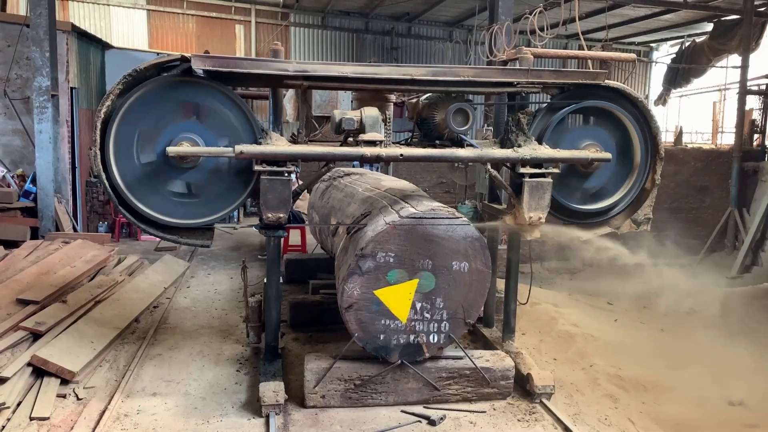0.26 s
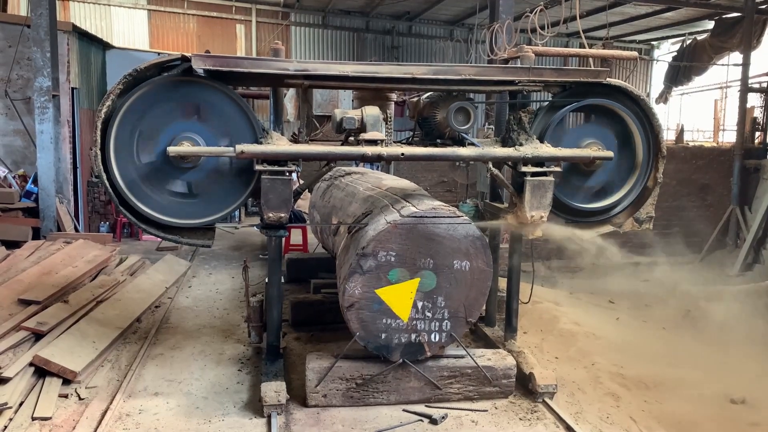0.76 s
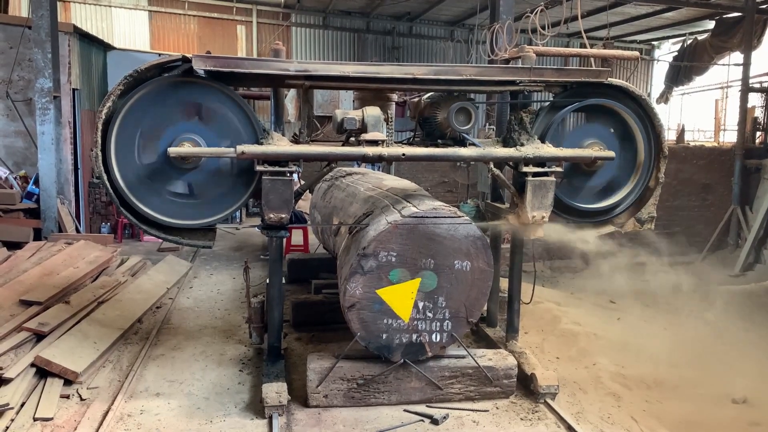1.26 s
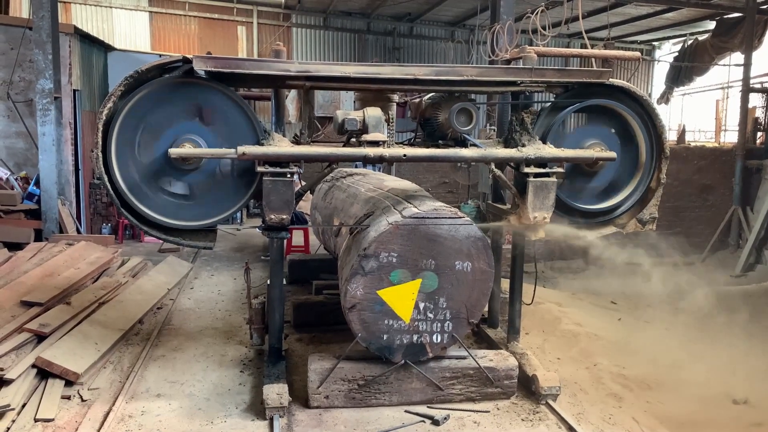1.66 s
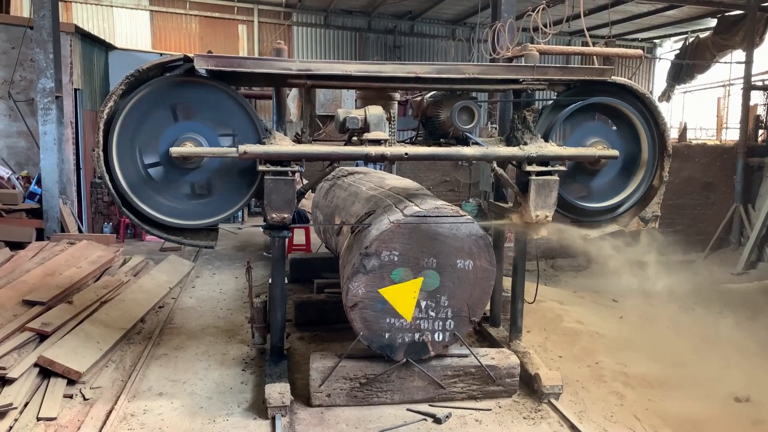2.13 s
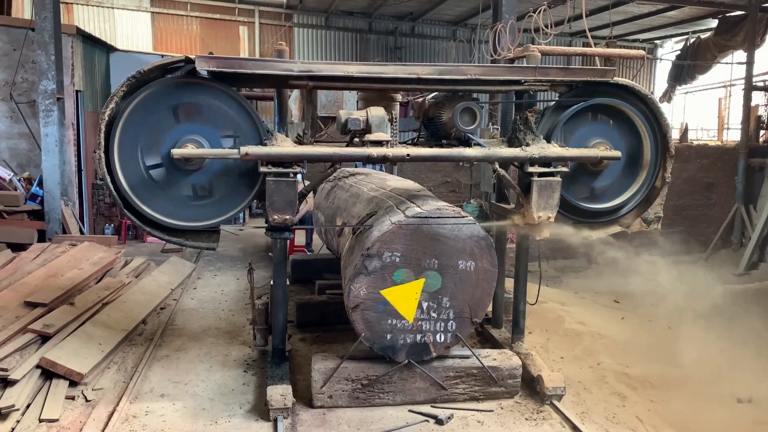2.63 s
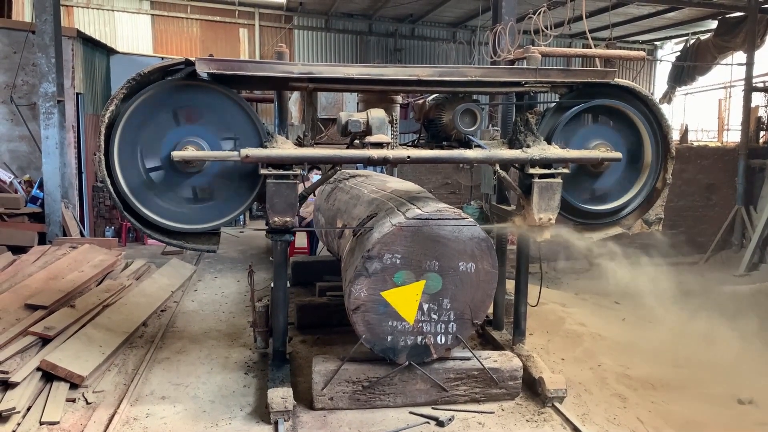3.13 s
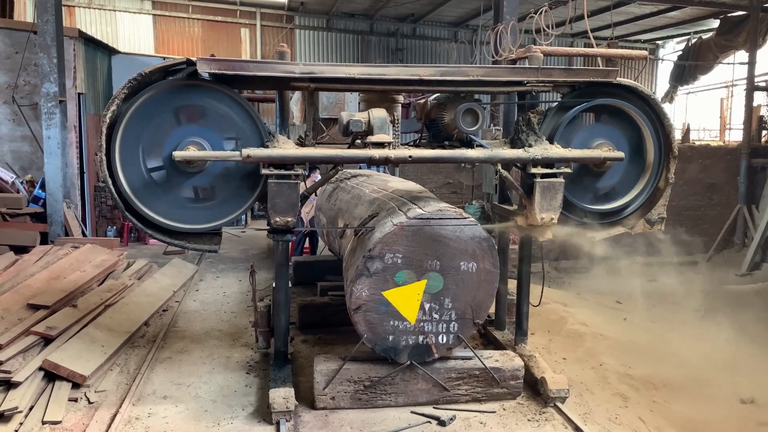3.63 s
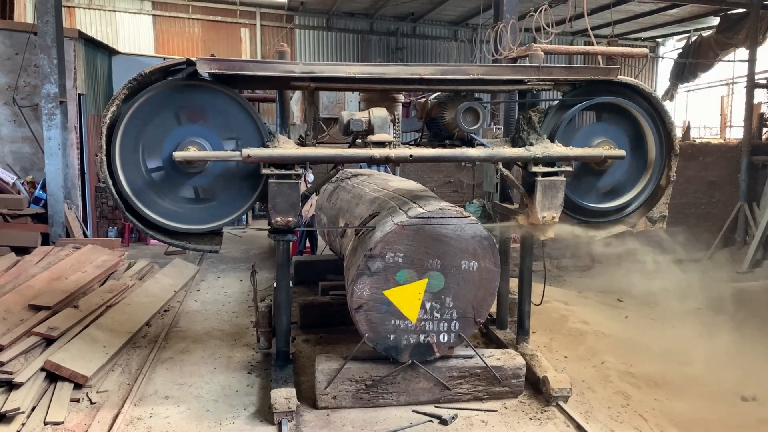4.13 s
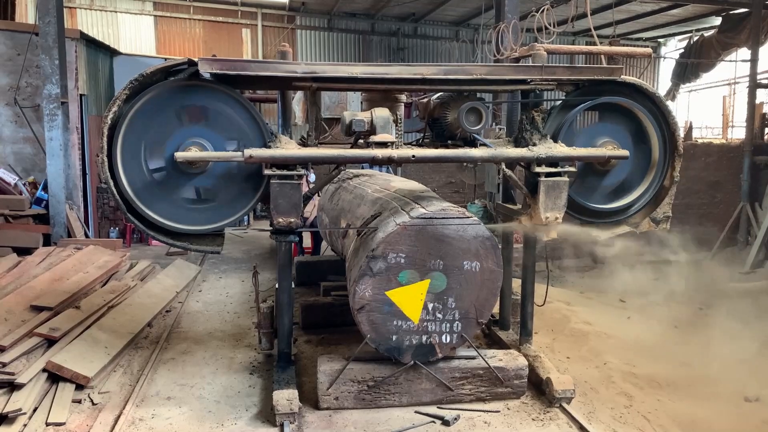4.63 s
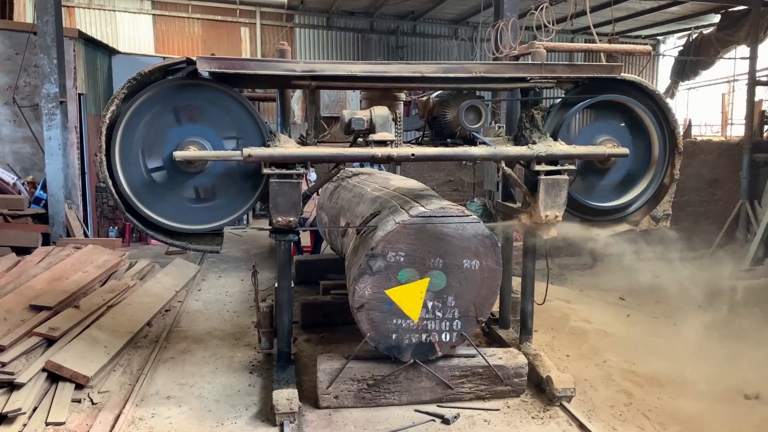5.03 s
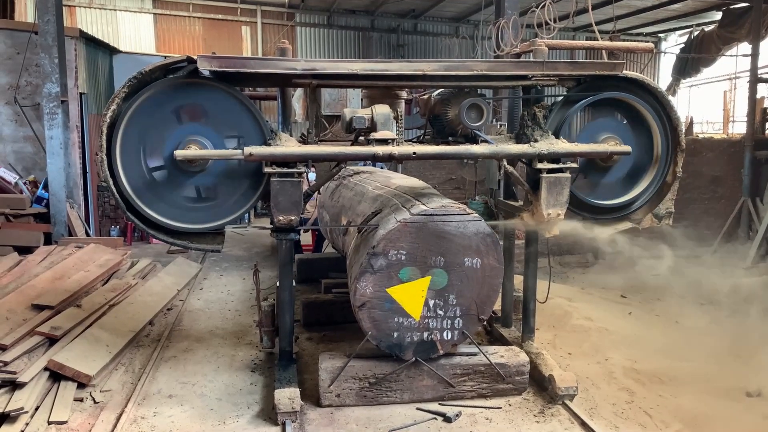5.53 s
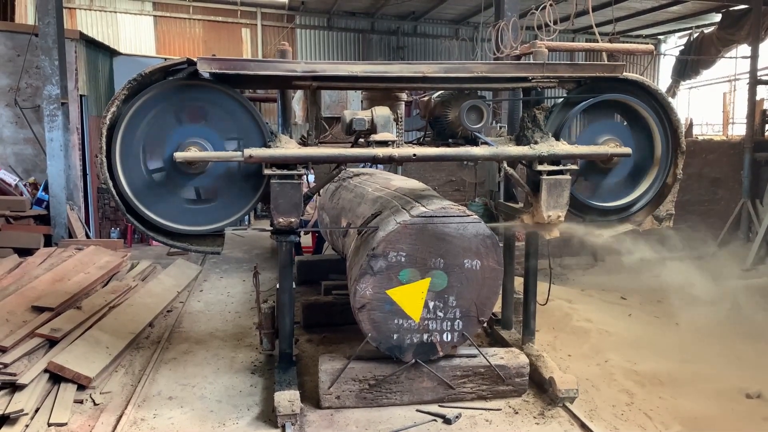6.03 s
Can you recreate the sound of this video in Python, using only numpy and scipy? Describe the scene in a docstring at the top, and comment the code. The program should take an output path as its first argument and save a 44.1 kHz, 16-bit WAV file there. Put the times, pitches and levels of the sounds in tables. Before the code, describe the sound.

A large band saw rips steadily through a big log, a broad bright hiss over a throbbing machine hum and low rumble.

```python
"""A broad, steady hiss is heard first: a big band sawmill rips along a log.
Its teeth pass about 500 times a second; their scrape is shaped noise, partly repeated at each tooth.
The steel band and frame ring as narrow resonances, and the log rasps as dull, patchy noise.
Every lap of the band repeats the same swells, over a throbbing drone and the rumble of the drive.
A jet of sawdust, strongest on the right, grows for most of the cut and then eases."""
import sys
import numpy as np
from scipy import signal
from scipy.fft import rfft, irfft, next_fast_len
from scipy.io import wavfile
from scipy.ndimage import map_coordinates

SR = 44100
rng = np.random.default_rng(int(sys.argv[2]) if len(sys.argv) > 2 else 0)


def wrap_up_sound(samples):
    """Save the sound to the file named by the first command line argument, as 16-bit audio."""
    columns = np.atleast_2d(samples).T
    # keep every value between -1 and 1, then stretch to whole-number steps
    tamed = np.clip(columns, -1, 1)
    steps = np.round(tamed * 32767).astype(np.int16)
    wavfile.write(sys.argv[1], SR, steps)


N = 276948  # length [samples]

LAPS_PER_S, HUM_PAIRS_PER_S = 3.95, 3.968  # band laps and pairs of hum swells [1/s]
TOOTH_HZ, THROB_HZ, TOP_HZ = 500.3, 43.95, 15760  # tooth passing, drone throb, band limit [Hz]

# Spectra and resonances give relative levels: each sound's overall level is set where it is used.
# Motor and wheel spectrum: (frequency [Hz], relative density [dB per Hz])
RUMBLE_SPECTRUM = [(10, -17), (30, -7), (60, -5), (100, -0.5), (160, -0.5), (230, 2.5), (430, 0),
                   (800, -13), (2000, -32)]
# Frame resonances: (centre [Hz], width parameter [Hz], relative peak density [dB])
DRONE_MODES = [(651, 45, -4), (694.4, 73, 2)]
HUM_MODES = [(339.6, 67, 0)]
# Paired swells of the hum: (centre [share of cycle], width at half height [cycles], height [dB])
HUM_SWELLS = [(.3, 0.15, 7.5), (.635, 0.19, 9)]
# The log's response to the teeth: (frequency [Hz], relative density [dB per Hz])
WOOD_SPECTRUM = [(300, -33), (500, -6.5), (780, -7.5), (880, 0.5), (1050, -1), (1300, -4.5), (1700, -12),
                 (3000, -33.5)]
# The rasp along the cut: (time [s], relative level [dB])
RASP_LEVEL = [(0, -0.2), (0.45, -0.3), (0.85, 1.5), (1.55, 1.4), (1.9, -0.5), (2.4, 1.9), (3.3, 0.3),
              (4, -0.5), (5.55, -0.4), (6.28, -1.7)]
# Overtones of the tooth rate: (multiple [-], rms level before fading [dB])
TOOTH_OVERTONES = [(3, -58), (5, -66), (6, -59), (8, -60), (9, -52.5)]
# Steel band resonances: (centre [Hz], width parameter [Hz], relative peak density [dB])
WHISTLE_MODES = [(4416, 115, 4.5), (4488, 67, 9), (4710, 110, -0.5)]
MIDDLE_MODES = [(1982, 53, -4), (2220, 180, -6.5), (2340, 112, -1.5), (2506, 97, 2), (2966, 21, -2.5),
                (3464, 100, -5.5), (3910, 180, -3.5)]
SHIMMER_MODES = [(8000, 130, -5.5), (8470, 150, 0), (9590, 300, -3), (10050, 120, 1.5), (11460, 120, -6),
                 (12870, 170, -2), (14500, 260, -7)]
# Stereo side of the shimmer: (frequency [Hz], left minus right [dB])
SHIMMER_SIDE = [(9900, -8), (11000, -1), (13000, 3)]
# The whistle and the middle ring along the cut: (time [s], relative level [dB])
WHISTLE_LEVEL = [(0, -2), (2.2, -0.2), (3.25, 1), (3.75, 0.5), (4.45, 0.3), (4.8, 0.5), (5.4, 3.5),
                 (6.28, 0.5)]
MIDDLE_LEVEL = [(0, 0.5), (0.25, 2.1), (1.85, -0.6), (2.85, 1.1), (4.95, 0.6), (6.28, -4.5)]
# The dust jet along the cut: (time [s], level before bite and panning [dB])
DUST_LEVEL = [(0, -54), (2, -49), (3.5, -39.5), (5.4, -38), (6.28, -43)]
# Spectrum of teeth scraping and dust spraying: (frequency [Hz], relative density [dB per Hz])
HISS_SPECTRUM = [(900, -34), (1700, -7.5), (2900, -5), (4000, -5.5), (4900, -5), (5300, -7.5), (6800, -4.5),
                 (7800, -4), (8150, 0.5), (9900, -2.5), (10500, -2.5), (13000, -4), (14000, -5),
                 (15700, -9.5)]
# Stereo side of the hiss: (frequency [Hz], left minus right [dB])
HISS_SIDE = [(3500, -0.7), (5500, -2), (7750, -3), (8200, -2), (9850, -5.5), (10350, 1), (12500, -2.5),
             (15000, 1)]
# Surges in harder wood: (centre time [s], width at half height [s], added bite [dB])
HARD_WOOD_GRABS = [(0.62, .1, 0.5), (2.153, 0.072, 2), (2.483, 0.034, 2.7), (4.174, 0.06, 1.5),
                   (5.702, .05, 1.9)]


def amp(db):
    """Decibel law: 20 dB is a factor of ten in amplitude."""
    return np.exp(np.asarray(db) * (np.log(10) / 20))


def unit(x):
    """Normalisation: dividing by the root mean square gives rms 1."""
    return x / np.sqrt(np.mean(x ** 2) + 1e-20)


def along(points, hz):
    """Interpolation of (frequency, value) points along a logarithmic frequency axis."""
    point_hz, values = np.transpose(points)
    return np.interp(np.log(hz + 1), np.log(point_hz + 1), values)


def clock():
    """Sampling: the time of every sample in seconds."""
    return np.arange(N) / SR


def curve(rows):
    """Linear interpolation of (time, value) points to one value per sample."""
    return np.interp(clock(), *np.transpose(rows))


def wobble(rate):
    """Slow random modulation: a smooth curve through `rate` random knots a second."""
    count = int(N * rate / SR) + 4
    at = np.arange(0, count, 1 / 8)
    smooth = map_coordinates(rng.standard_normal(count), [at])
    return np.interp(clock() * rate, at, smooth)


def bump(distance, width):
    """Gaussian bell of height 1, with its full width given at half height."""
    return np.exp(-np.log(2) * (2 * distance / width) ** 2)


def recurring(per_s, at, width):
    """Periodicity: a bell returns at the same share of every cycle."""
    distance = (clock() * per_s - at + .5) % 1 - .5
    return bump(distance, width)


def filtered(x, response):
    """Linear filtering: the spectrum is multiplied by a response of frequency."""
    size = next_fast_len(N + 8192)  # the padding leaves room for the filter's tail
    hz = np.fft.rfftfreq(size, 1 / SR)
    return irfft(rfft(x, size) * response(hz), size)[..., :N]


def white():
    """Incoherence: independent white noises on left and right."""
    return rng.standard_normal((2, N))


def pan(side_db):
    """Interaural level difference: gains for left minus right in dB, negative to the right."""
    return amp(np.vstack([side_db, -side_db]) / 2)


def ringing(modes):
    """Resonance: steep-skirted modes shape random excitation, independent left and right, rms 1."""
    size = next_fast_len(N)
    hz = np.fft.rfftfreq(size, 1 / SR)
    power = sum(amp(db) ** 2 / (1 + ((hz - centre) / width) ** 2 * 2) ** 3
                for centre, width, db in modes)
    blows = rng.standard_normal((2, 2 * len(hz))).view(complex)  # random complex spectrum
    return unit(irfft(blows * np.sqrt(power), size)[:, :N])


def patchy(x, depth_db, span_hz, life_s):
    """Time-frequency modulation: short-lived louder and softer patches in a noise, then rms 1."""
    hz, t, spectrum = signal.stft(x, SR, nperseg=256)
    knots = rng.standard_normal((256, 1024))
    places = np.meshgrid(hz / span_hz, t / life_s, indexing="ij")
    field = map_coordinates(knots, places, mode="mirror")
    _, shaped = signal.istft(spectrum * amp(depth_db * field), SR, nperseg=256)
    return unit(shaped[:, :N])


def drive(level_db):
    """Broadband machine noise: motor and wheels rumble as low filtered noise."""
    rumble = filtered(white(), lambda hz: amp(along(RUMBLE_SPECTRUM, hz)))
    return amp(level_db) * unit(rumble) * pan(-3.0)


def frame(drone_db, hum_db, throb_db):
    """Structural resonance: the drive throbs the frame's drone, and a lower hum follows its own level."""
    throb = np.cos(2 * np.pi * (THROB_HZ * clock() - .17))
    drone = ringing(DRONE_MODES) * amp(drone_db + throb_db * throb + 0.98 * wobble(25)) * pan(-5.5)
    hum = ringing(HUM_MODES) * amp(hum_db) * pan(-7.0)
    return drone + hum


def hum_swells():
    """Periodic level modulation: the hum's paired swells in dB, about one pair a lap, mean 0."""
    swell_db = sum(db * recurring(HUM_PAIRS_PER_S, at, width) for at, width, db in HUM_SWELLS)
    return swell_db - swell_db.mean()


def log_rasp(level_db):
    """Fracture noise: the log resounds dully, in shifting patches, as its fibres tear."""
    rasp = filtered(white(), lambda hz: amp(along(WOOD_SPECTRUM, hz)))
    rasp = patchy(rasp, depth_db=1.17, span_hz=245, life_s=.09)
    return rasp * amp(level_db + 1.35 * wobble(150)) * pan(-1.8)


def tooth_tone(drift, fade_db, wander):
    """Harmonic series: even tooth spacing gives thin overtones that waver with the band's speed.

    drift is a fraction of the tooth rate; wander is in cycles, apart at each ear."""
    turns = np.cumsum(TOOTH_HZ * (1 + drift * wobble(13))) / SR

    def tone(multiple):
        phase = multiple * turns + rng.random() + wander * wobble(8)  # in cycles
        return np.sqrt(2) * np.sin(2 * np.pi * phase) * amp(fade_db * wobble(10))

    return sum(amp(db) * np.array([tone(multiple), tone(multiple)])
               for multiple, db in TOOTH_OVERTONES)


def band(whistle_db, middle_db, shimmer_db, flicker_db):
    """Modal vibration: the steel band whistles in the kerf; its other modes flare separately."""
    whistle = ringing(WHISTLE_MODES) * amp(whistle_db + flicker_db * wobble(40)) * pan(-0.6)

    def flare(centre, width, db, depth_db, rate):
        # the root of the width turns a peak density into an amplitude
        return ringing([(centre, width, 0)]) * np.sqrt(width) * amp(db + depth_db * wobble(rate))

    middle = sum(flare(*mode, depth_db=3.05, rate=36) for mode in MIDDLE_MODES)
    shimmer = sum(flare(*mode, depth_db=1.6, rate=30) * pan(along(SHIMMER_SIDE, mode[0]))
                  for mode in SHIMMER_MODES)
    return whistle + unit(middle) * amp(middle_db) * pan(-0.8) + unit(shimmer) * amp(shimmer_db)


def dust_jet(centre_hz, width_hz):
    """Jet noise: sawdust sprays out of the kerf as one broad resonance, stronger on the right."""
    return ringing([(centre_hz, width_hz, 0)]) * amp(curve(DUST_LEVEL)) * pan(-2.4)


def lap_bite():
    """Periodic cutting force: a slack spot and three ripples a lap, in dB, deeper in tough wood."""
    ripple = np.cos(2 * np.pi * 3 * (clock() * LAPS_PER_S - .17))
    slack = recurring(LAPS_PER_S, at=0.042, width=0.28)  # shares of the lap
    uneven_db = 0.15 * ripple - 1.3 * slack
    tough = bump(clock() - 1.9, width=0.42)  # a stretch of the log, in seconds
    return (uneven_db - uneven_db.mean()) * (1 + 0.83 * tough)


def grabs():
    """Transient cutting force: brief surges, in dB, where the teeth meet harder wood."""
    return sum(db * bump(clock() - s, length) for s, length, db in HARD_WOOD_GRABS)


def hiss(bite_db, level_db, echo, flutter_db, flutter_hz, chip_rate, chip_size):
    """Friction noise: teeth scrape the kerf, each partly repeating the last, and chips snap off."""
    chips = (rng.random((2, N)) < chip_rate / SR) * np.sign(white()) * chip_size
    flutter = unit(filtered(rng.standard_normal(N),
                            lambda hz: np.exp(-(2 * (hz / flutter_hz - 1)) ** 2)))

    def response(hz):
        comb = 1 + echo * np.exp(-2j * np.pi * hz / TOOTH_HZ)  # echo delayed by one tooth period
        return amp(along(HISS_SPECTRUM, hz)) * comb * pan(along(HISS_SIDE, hz))

    scrape = filtered(white() + chips, response)
    scrape = patchy(scrape, depth_db=1.3, span_hz=1180, life_s=.025)
    return scrape * amp(level_db + bite_db + flutter_db * flutter)


def scene():
    """Superposition: all parts of the saw add, many of them tied together by the lap of the band."""
    lap_db, t = lap_bite(), clock()
    bite_db = lap_db + grabs() + 0.51 * wobble(36)
    rumble = drive(level_db=-48.5)
    # over the cut the drone rises 0.14 dB/s and the hum fades 0.36 dB/s
    machine = frame(drone_db=0.14 * t + 0.23 * lap_db - 38.5,
                    hum_db=hum_swells() - 0.36 * t - 44.5, throb_db=2.5)
    wood = log_rasp(curve(RASP_LEVEL) + 0.35 * lap_db - 38.0)
    teeth = tooth_tone(drift=0.00146, fade_db=4.0, wander=0.22)
    steel = band(whistle_db=curve(WHISTLE_LEVEL) + 2.6 * lap_db - 39.5,
                 middle_db=curve(MIDDLE_LEVEL) + 0.33 * lap_db - 39.5,
                 shimmer_db=0.68 * bite_db - 33.5, flicker_db=2.1)
    dust = dust_jet(centre_hz=6920, width_hz=2600) * amp(bite_db)
    cutting = hiss(bite_db, level_db=-27.0, echo=0.078, flutter_db=0.8, flutter_hz=103,
                   chip_rate=130, chip_size=4.9)  # chips a second on each side
    return rumble + machine + wood + teeth + steel + dust + cutting


def record(dry):
    """Band limitation: nothing at or above the top frequency passes."""
    return filtered(dry, lambda hz: hz < TOP_HZ)


dry = scene()
out = record(dry)
wrap_up_sound(out)
```